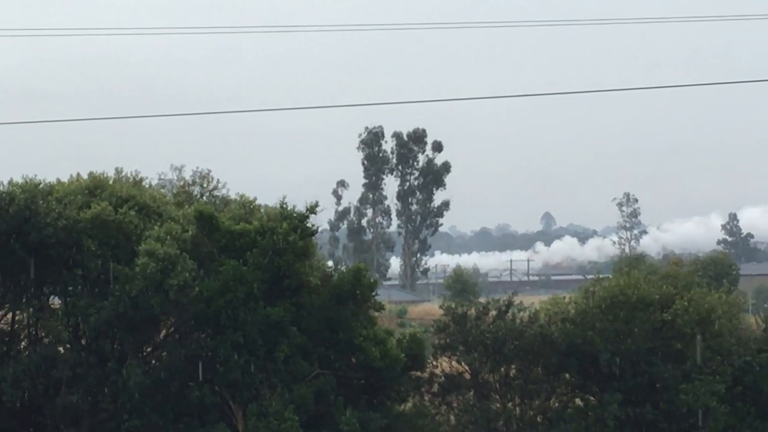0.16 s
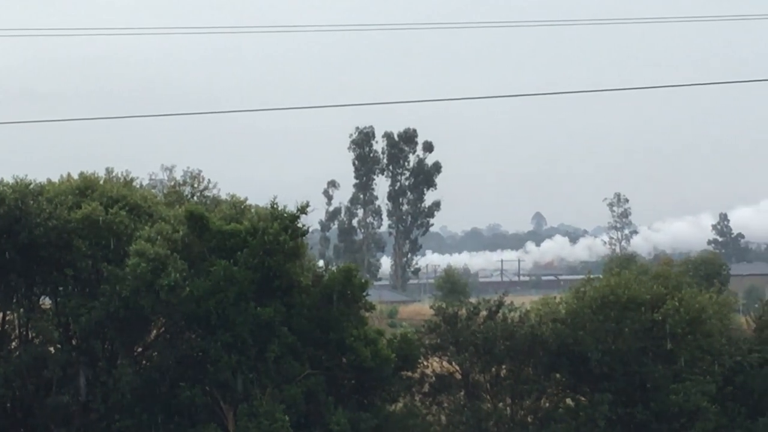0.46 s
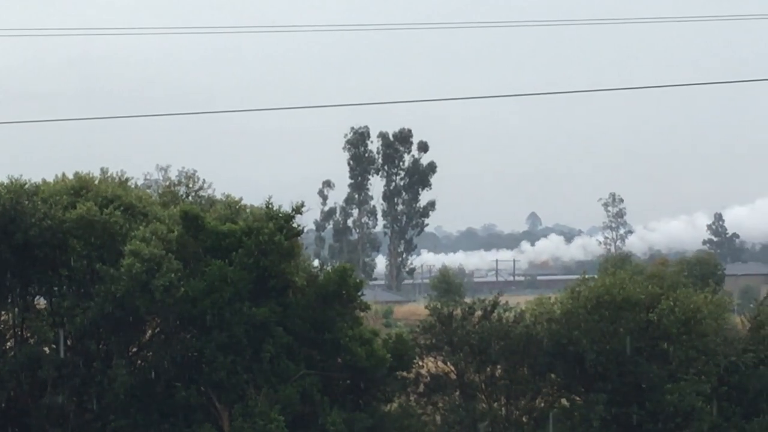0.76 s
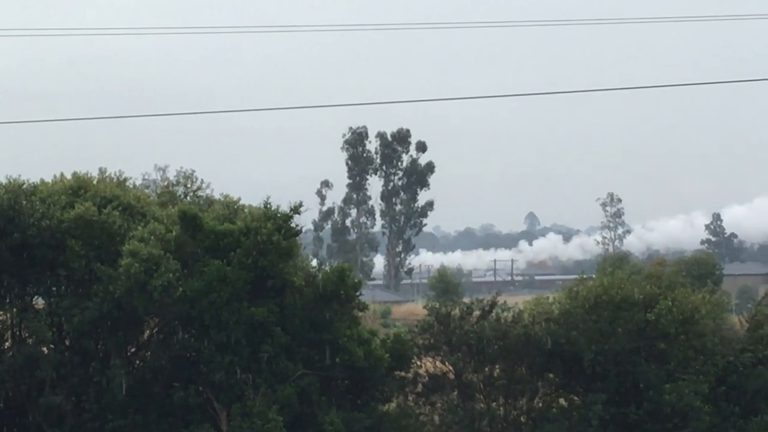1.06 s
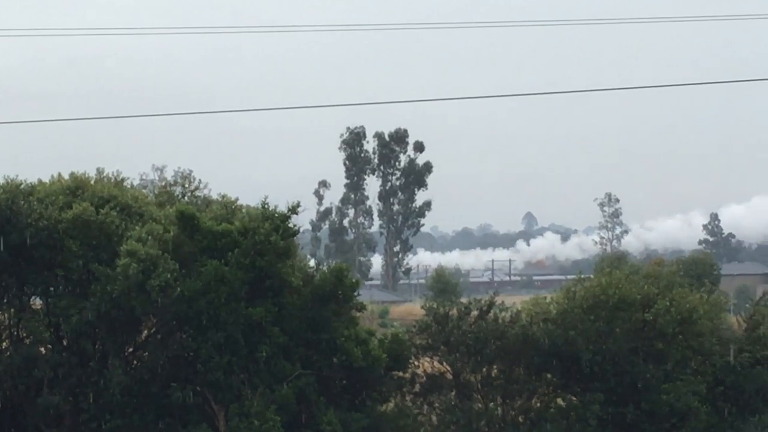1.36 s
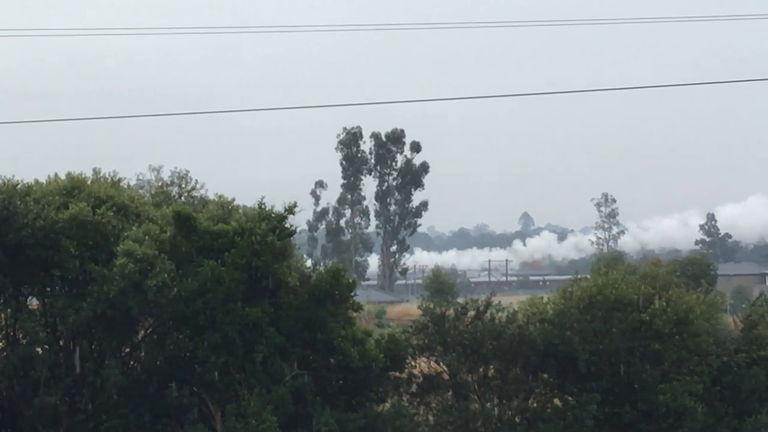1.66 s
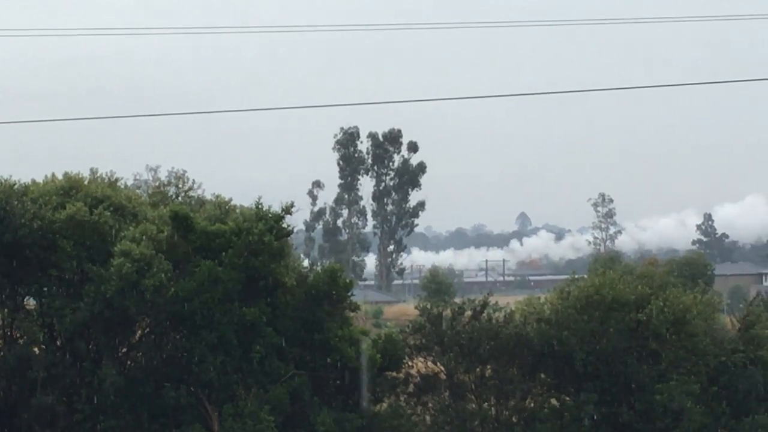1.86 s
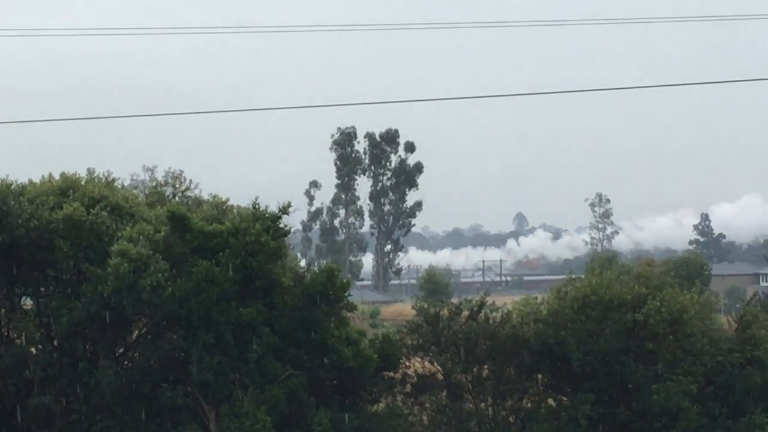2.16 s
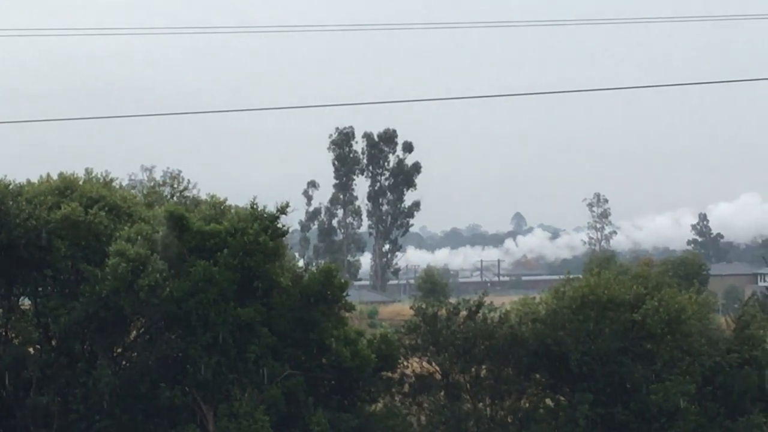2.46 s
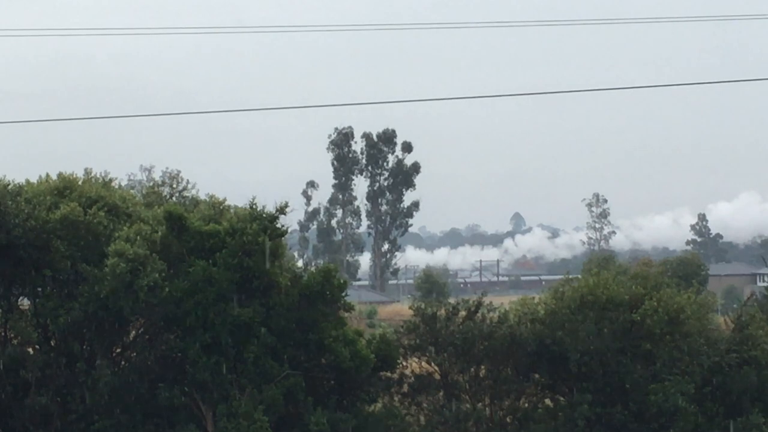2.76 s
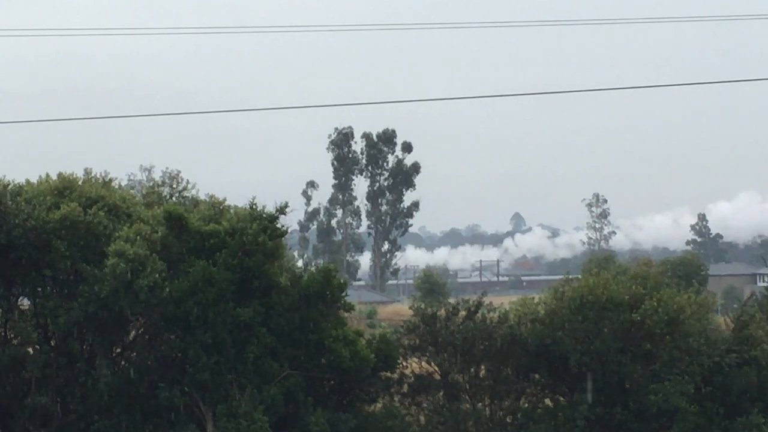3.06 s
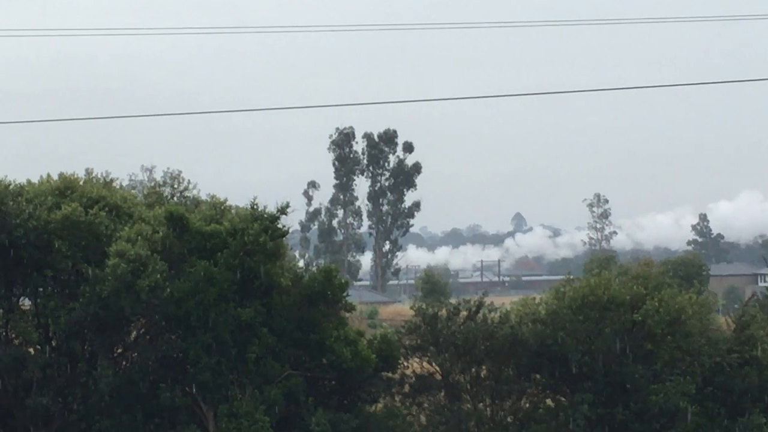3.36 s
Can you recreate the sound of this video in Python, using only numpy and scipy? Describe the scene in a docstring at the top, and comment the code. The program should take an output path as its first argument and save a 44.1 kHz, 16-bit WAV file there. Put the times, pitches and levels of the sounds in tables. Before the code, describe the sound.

A car passes on a wet road: a long tyre hiss swells midway and stays strong, over low rumble and faint engine hum, while light rain ticks on leaves near one outdoor microphone.

```python
"""A long hiss swells over a low rumble, with light rain. Hiss: shaped noise, comb-filtered by short reflections
near the one microphone; the comb drifts. Rumble: two bands of low noise with separate level curves, plus two
faint wavering hums. Rain: decaying sine ticks at random times."""
import sys
import numpy as np
from scipy import signal
from scipy.fft import rfft, irfft, next_fast_len
from scipy.io import wavfile
from scipy.ndimage import uniform_filter1d, map_coordinates

SR = 44100
rng = np.random.default_rng(int(sys.argv[2]) if len(sys.argv) > 2 else 0)


def wav_record(signal):
    """Record a signal, one row per channel, as 16-bit PCM in the file named by sys.argv[1]."""
    frames = np.transpose(np.atleast_2d(signal))
    bounded = np.clip(frames, -1, 1)
    # unit amplitude maps onto the largest positive 16-bit level
    quanta = np.round(bounded * 32767).astype(np.int16)
    wavfile.write(sys.argv[1], SR, quanta)


def nominal_scale(level):
    """Amplitude ratio for a level in decibels (scalar or array-like)."""
    x = np.asarray(level, float) / 20
    return 10 ** x


N = 154791  # samples


def unit(x):
    """Scales to rms 1."""
    return x / np.sqrt(np.mean(x ** 2) + 1e-20)


def along(points, f_hz):
    """Reads (Hz, value) points on a log frequency axis."""
    point_hz, value = np.transpose(points)
    return np.interp(np.log(f_hz + 1), np.log(point_hz + 1), value)


def curves(rows, t_s):
    """Reads each column after the time at times t_s."""
    row_s, *columns = np.transpose(rows)
    return [np.interp(t_s, row_s, column) for column in columns]


def wobble(knots_per_s, t_s):
    """Smooth random curve: a spline through normal random knots."""
    return map_coordinates(rng.standard_normal(400), [t_s * knots_per_s])


# Reflections close to the microphone: [t/s, then (signed gain, delay/ms) x 4]
NEAR_REFLECTIONS = [(0.0, 0.145, 0.247, -0.194, 0.376, -0.069, 0.552, -0.021, 0.717),
                    (0.29, 0.147, 0.247, -0.215, 0.377, -0.1, 0.547, 0.042, 0.743),
                    (0.58, 0.138, 0.247, -0.204, 0.375, 0.108, 0.587, 0.042, 0.738),
                    (0.88, 0.003, 0.251, -0.287, 0.36, 0.037, 0.58, 0.078, 0.729),
                    (1.17, 0.095, 0.217, -0.307, 0.351, 0.125, 0.556, 0.052, 0.718),
                    (1.46, 0.068, 0.269, -0.327, 0.34, 0.097, 0.539, -0.06, 0.734),
                    (1.75, 0.127, 0.23, -0.227, 0.355, 0.102, 0.483, -0.023, 0.73),
                    (2.04, 0.099, 0.199, -0.204, 0.351, -0.078, 0.527, -0.048, 0.726),
                    (2.33, -0.166, 0.247, -0.252, 0.356, -0.098, 0.533, -0.043, 0.796),
                    (2.62, -0.185, 0.261, -0.256, 0.352, 0.024, 0.551, -0.068, 0.782),
                    (2.92, 0.13, 0.19, -0.274, 0.341, 0.047, 0.536, -0.044, 0.731),
                    (3.21, 0.286, 0.209, -0.288, 0.346, 0.114, 0.498, -0.077, 0.722),
                    (3.5, 0.112, 0.221, -0.253, 0.344, -0.002, 0.493, -0.053, 0.723)]
# Longer, duller reflections: [t/s, then (signed gain below the roll-off, delay/ms) x 3]
FAR_REFLECTIONS = [(0.0, -0.084, 1.426, -0.198, 2.016, 0.017, 1.38),
                   (0.29, -0.218, 1.413, -0.142, 2.017, 0.132, 1.377),
                   (0.58, -0.27, 1.393, -0.146, 2.022, 0.206, 1.374),
                   (0.88, -0.159, 1.392, -0.163, 1.999, 0.176, 1.311),
                   (1.17, -0.072, 1.45, -0.006, 2.062, 0.079, 1.277),
                   (1.46, -0.129, 1.441, -0.064, 2.024, 0.134, 1.338),
                   (1.75, -0.051, 1.439, -0.098, 2.033, -0.034, 1.309),
                   (2.04, -0.046, 1.441, -0.029, 2.012, -0.037, 1.318),
                   (2.33, -0.008, 1.414, -0.023, 2.028, 0.098, 1.308),
                   (2.62, -0.049, 1.431, -0.082, 2.054, 0.03, 1.3),
                   (2.92, 0.005, 1.422, -0.031, 2.05, 0.05, 1.302),
                   (3.21, 0.049, 1.361, -0.067, 2.038, -0.036, 1.256),
                   (3.5, -0.189, 1.288, -0.026, 2.029, 0.152, 1.301)]
FAR_ROLLOFF_HZ = 5000  # gain halved here


def comb_gain(f_hz, t_s):
    """Magnitude of the direct path plus delayed copies: peaks and notches that drift with the delays."""
    def echoes(columns):
        """Sums the reflections as phasors."""
        pairs = zip(columns[::2], columns[1::2])
        return sum(gain * np.exp(-2j * np.pi * f_hz * delay_ms / 1000) for gain, delay_ms in pairs)

    near = echoes(curves(NEAR_REFLECTIONS, t_s))
    far = echoes(curves(FAR_REFLECTIONS, t_s)) / (1 + (f_hz / FAR_ROLLOFF_HZ) ** 2)
    return np.abs(1 + near + far)


# Narrow hollows in the hiss: [start t/s, end t/s, start f/Hz, end f/Hz, width/Hz, depth/dB (< 0: bright band)]
HISS_HOLLOWS = [(-.2, 1.1, 12600, 13450, 200, 9), (-.2, .8, 10600, 10600, 220, 4),
                (.85, 1.5, 11000, 12500, 250, 3), (-.2, 1.1, 2000, 2000, 90, 5),
                (-.2, 1.05, 4000, 4200, 100, 4), (1.05, 1.9, 2750, 2800, 150, 4),
                (1.1, 1.6, 4900, 4950, 150, 3), (2.2, 2.7, 4900, 4900, 150, 4),
                (1.7, 2.6, 7500, 7900, 250, 3), (3.05, 3.47, 2800, 2850, 150, 3.5),
                (3.1, 3.6, 7400, 7500, 300, 3), (1.1, 1.4, 3800, 3900, 500, -2.5),
                (-.2, 1.1, 1250, 1250, 100, -2)]
HOLLOW_FADE_S = .08


def hollows_db(f_hz, t_s):
    """Gaussian dips that open, glide in frequency and close."""
    total_db = 0
    for start_s, end_s, start_hz, end_hz, width_hz, depth_db in HISS_HOLLOWS:
        opening = np.tanh((t_s - start_s) / HOLLOW_FADE_S)
        closing = np.tanh((t_s - end_s) / HOLLOW_FADE_S)
        opened = (opening - closing) / 2
        centre_hz = np.interp(t_s, [start_s, end_s], [start_hz, end_hz])
        total_db = total_db - depth_db * opened * np.exp(-((f_hz - centre_hz) / width_hz) ** 2)
    return total_db


# Hiss before the comb: [t/s, level/dB, tilt/(dB per octave), extra treble at 8 kHz/dB]
HISS_SWELL = [(0.0, -34, 0.2, -2.5), (0.29, -32.5, 0.85, -0.6), (0.58, -33.5, -1.3, 0.7),
              (0.88, -32.5, -0.84, 1.8), (1.17, -32.5, -0.9, 1.7), (1.46, -28, 1.1, -1.7),
              (1.75, -28, 0.1, -1.1), (2.04, -28, 0.3, 0.0), (2.33, -29, -0.7, 0.5),
              (2.62, -28.5, 0.3, 0.5), (2.92, -28, 0.67, 0.3), (3.21, -28.5, 0.8, -0.5),
              (3.5, -29.9, -0.2, 0.9)]
# Relative hiss spectrum before the comb: [f/Hz, density/(dB per Hz)]
HISS_COLOUR = [(650, -8), (900, -4.5), (1300, -1.9), (1800, -2.0), (2500, -0.34), (3500, -2.5),
               (4400, -6.5), (4900, -7.5), (5500, 0.0), (6800, -6.5), (7600, -10.5), (8400, -2.1),
               (9600, -10), (10500, -17.4), (11300, -6.5), (13000, -17.0), (14500, -17), (15600, -25)]
HISS_LOW_SLOPE_DB_PER_OCTAVE = 5.5  # extra fall below the first colour point
# Level flutter, whole hiss: [rate/(knots per s), knot spread/dB]
HISS_FLUTTER = [(5, .15), (60, .5)]
# Gain flutter, treble only: [rate/(knots per s), knot spread/dB]
TREBLE_FLUTTER = [(6, .85), (14, .4)]
TREBLE_HZ = 6000
PATCHY_DB = .8  # rms of the time-frequency unevenness


def hiss():
    """Broad hiss that swells and changes brightness, heard directly and off near surfaces."""
    hz, t_s, noise = signal.stft(rng.standard_normal(N), SR, nperseg=1024, noverlap=768)
    f_hz = hz[:, None]

    low_octaves = np.minimum(np.log2((f_hz + 1) / HISS_COLOUR[0][0]), 0)
    colour = nominal_scale(along(HISS_COLOUR, f_hz) + HISS_LOW_SLOPE_DB_PER_OCTAVE * low_octaves)
    coloured = noise * colour / np.sqrt(np.mean(colour ** 2))

    level_db, tilt, top_db = curves(HISS_SWELL, t_s)
    gain_db = level_db + tilt * np.log2((f_hz + 200) / 4000) + top_db * (f_hz / 8000) ** 2

    patches = uniform_filter1d(rng.standard_normal(noise.shape), size=40, axis=0)
    patches = uniform_filter1d(patches, size=24, axis=1)
    gain_db = gain_db + PATCHY_DB * unit(patches)

    treble_db = sum(db * wobble(rate, t_s) for rate, db in TREBLE_FLUTTER)
    gain_db = gain_db + treble_db / (1 + (TREBLE_HZ / (f_hz + 1)) ** 4)
    gain_db = gain_db + hollows_db(f_hz, t_s)

    spectrum = coloured * comb_gain(f_hz, t_s) * nominal_scale(gain_db)
    hissing = signal.istft(spectrum, SR, nperseg=1024, noverlap=768)[1][:N]
    sample_s = np.arange(N) / SR
    return hissing * nominal_scale(sum(db * wobble(rate, sample_s) for rate, db in HISS_FLUTTER))


# Hums: [t/s, f/Hz before waver, fundamental level/dB rms]
LOWER_HUM = [(0, 112, -58), (.3, 115, -49), (.6, 113, -64), (1.7, 116, -60), (2.3, 112, -50),
             (2.8, 106, -56), (3.5, 104, -66)]
UPPER_HUM = [(0, 120, -80), (2.3, 121, -68), (2.8, 126, -53), (3.5, 140, -50)]
HUM_WAVER_HZ, HUM_WAVER_KNOTS_PER_S = 1.34, 8
HUM_OCTAVE_DB = -6.5  # second harmonic re fundamental


def hum(track, t_s):
    """Engine line: a wavering sine plus its octave."""
    hz, level_db = curves(track, t_s)
    hz = hz + HUM_WAVER_HZ * wobble(HUM_WAVER_KNOTS_PER_S, t_s)
    phase = 2 * np.pi * np.cumsum(hz) / SR
    return np.sqrt(2) * nominal_scale(level_db) * (np.sin(phase) + nominal_scale(HUM_OCTAVE_DB) * np.sin(2 * phase))


# Relative rumble spectrum: [f/Hz, density/(dB per Hz)]
RUMBLE_COLOUR = [(13, -44), (22, -16), (48, -5.5), (65, 3), (108, -2.5), (150, -7.5), (262, -9), (437, -18),
                 (515, -24), (600, -17), (780, -31), (1320, -120)]
# Deep band: [t/s, level/dB]
DEEP_LEVEL = [(0.1, -45.5), (0.15, -40), (0.49, -43.5), (1.3, -41), (1.31, -38), (1.68, -45), (1.93, -41),
              (3.4, -41.5)]
# Upper band: [t/s, level/dB]
UPPER_LEVEL = [(0.1, -48), (0.67, -50.5), (0.94, -46.5), (0.96, -52), (1.11, -47), (3.4, -44.5)]
BAND_SPLIT_HZ = 140


def rumble():
    """Low rolling noise, split by power into two bands, with two faint hums."""
    t_s, padded = np.arange(N) / SR, next_fast_len(N)
    f_hz = np.fft.rfftfreq(padded, 1 / SR)
    deep_share = 1 / (1 + (f_hz / BAND_SPLIT_HZ) ** 6)
    noise = rfft(rng.standard_normal((2, padded))) * nominal_scale(along(RUMBLE_COLOUR, f_hz))
    deep, upper = irfft(noise * np.sqrt([deep_share, 1 - deep_share]), padded)[:, :N]
    deep = unit(deep) * nominal_scale(curves(DEEP_LEVEL, t_s)[0])
    upper = unit(upper) * nominal_scale(curves(UPPER_LEVEL, t_s)[0])
    return deep + upper + hum(LOWER_HUM, t_s) + hum(UPPER_HUM, t_s)


DROPS_PER_S = 400
DROP_FLOOR_DB, DROP_SPREAD_DB = -44, 2.5  # softest peak scale; mean excess above it
DROP_MID_HZ, DROP_DECAY_CYCLES = 7000, 1.2  # pitch within an octave either way; cycles to 1/e


def rain():
    """Small drops tick on leaves nearby: short decaying sines, a few much louder than the rest."""
    when, pitch, size = rng.random((int(DROPS_PER_S * N / SR), 3)).T
    hz = (DROP_MID_HZ * 2 ** (2 * pitch - 1))[:, None]
    k = np.arange(96)  # samples per tick
    cycles = hz * k / SR
    level_db = DROP_FLOOR_DB - DROP_SPREAD_DB * np.log(size + 1e-4)
    ticks = np.sin(2 * np.pi * cycles) * np.exp(-cycles / DROP_DECAY_CYCLES) * nominal_scale(level_db)[:, None]
    places = (when * N).astype(int)[:, None] + k
    drops = np.bincount(places.ravel(), ticks.ravel())[:N]
    return np.pad(drops, (0, N - len(drops)))


def scene():
    """One microphone feeds both channels."""
    return np.tile(hiss() + rumble() + rain(), (2, 1))


def roll_off(x):
    """The treble ends steeply here."""
    return signal.sosfilt(signal.butter(12, 16100, fs=SR, output="sos"), x)


def record(dry):
    """Removes everything from top_hz up."""
    top_hz = 15850
    passband = np.fft.rfftfreq(N, 1 / SR) < top_hz
    mix = irfft(rfft(dry) * passband, N)
    return roll_off(mix)


dry = scene()
out = record(dry)
wav_record(out)
```